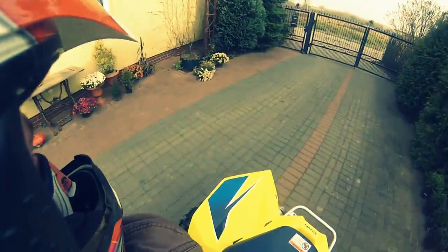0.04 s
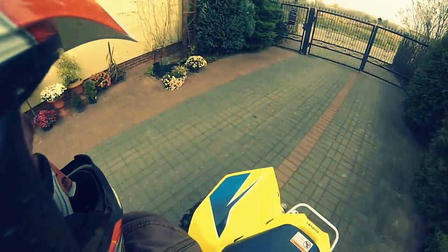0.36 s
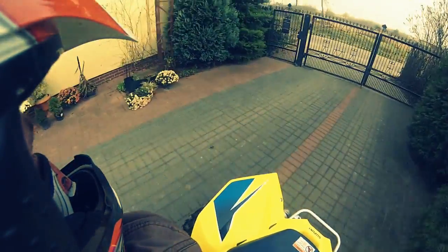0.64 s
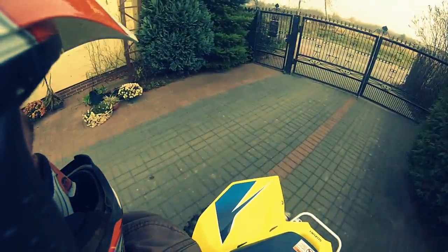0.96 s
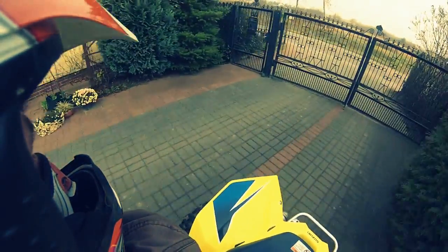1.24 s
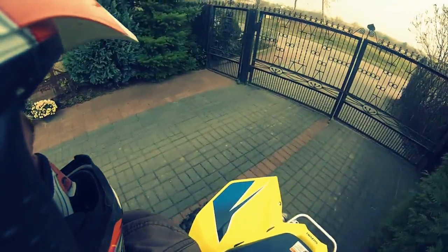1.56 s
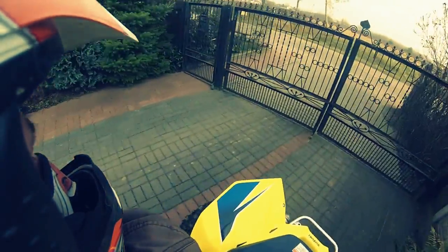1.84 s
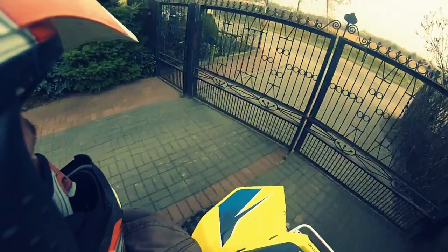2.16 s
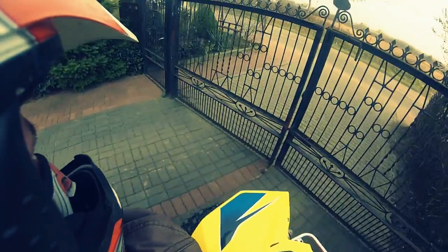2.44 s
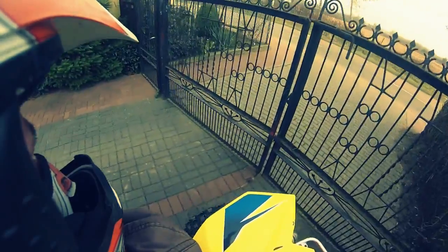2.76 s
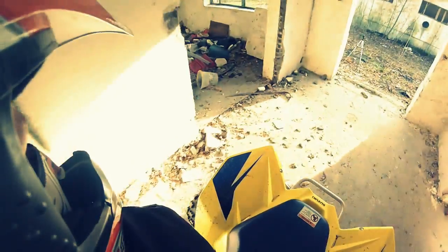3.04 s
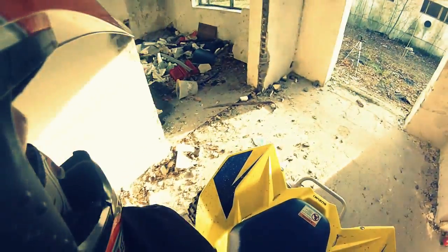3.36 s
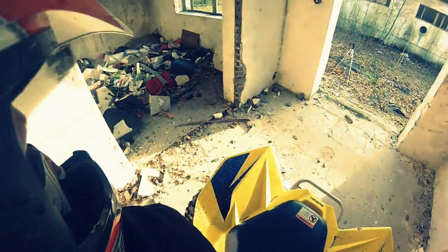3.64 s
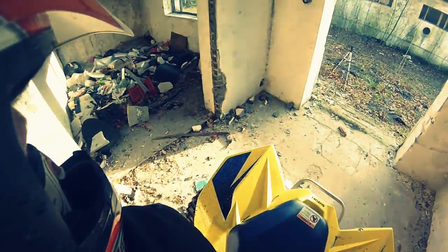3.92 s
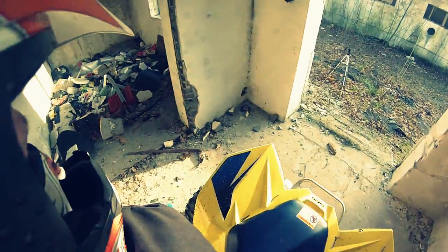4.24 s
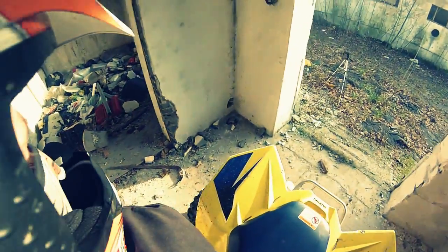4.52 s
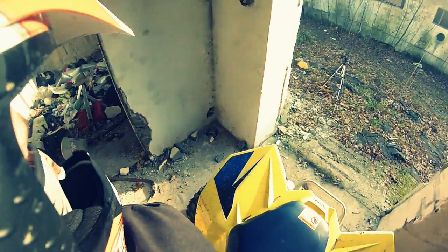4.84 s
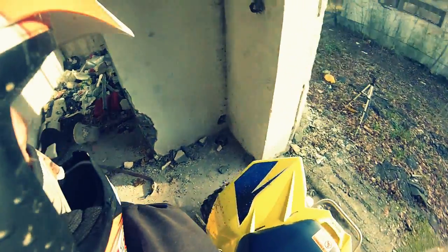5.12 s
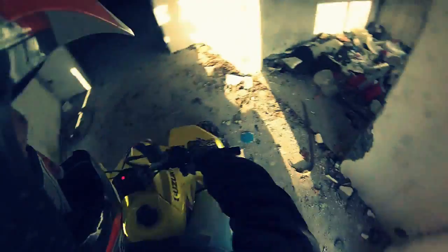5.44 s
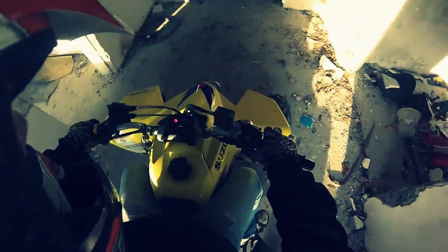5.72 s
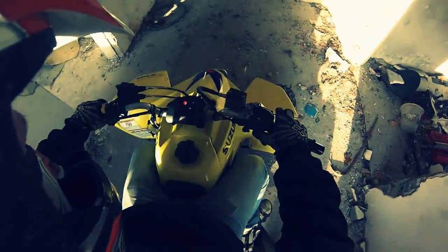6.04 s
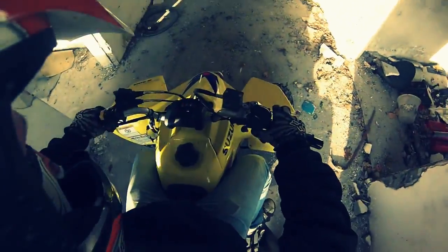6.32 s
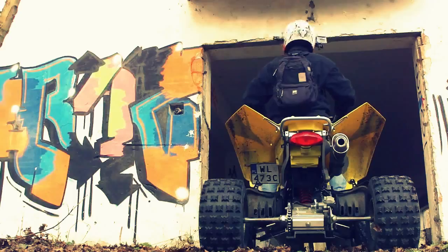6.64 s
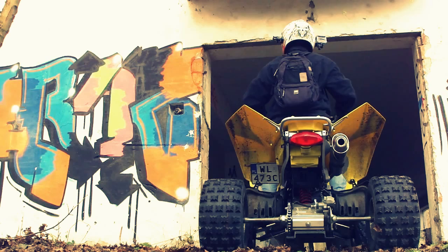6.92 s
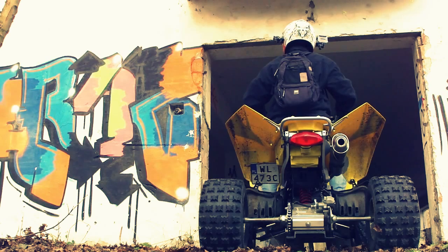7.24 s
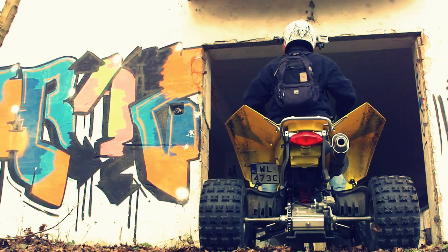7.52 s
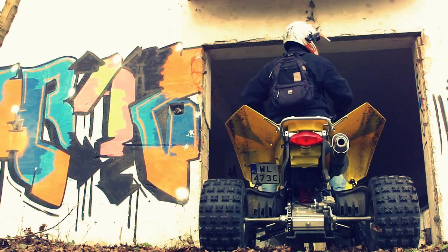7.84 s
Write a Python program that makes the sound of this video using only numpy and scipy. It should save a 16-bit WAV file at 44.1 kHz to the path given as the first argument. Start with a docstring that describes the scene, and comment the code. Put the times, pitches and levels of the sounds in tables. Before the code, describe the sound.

Heard from a helmet lightly buffeted by air, a four-stroke quad bike thumps along between short throttle blips that pop from the exhaust. After an abrupt cut indoors, the engine hums and booms off bare walls, its barks ringing on and loose metal knocking as it slows. Another cut puts the microphone low behind the exhaust, where the idle is much louder and the revs crackle sharply.

```python
"""On a paved driveway, then inside a bare ruin, a one-cylinder four-stroke quad bike idles and is revved.
We hear both from the rider's helmet, rocked by air, and last we listen from the ground behind the silencer.
Every firing thumps the exhaust pipe and pushes out a hiss of gas. On a blip (a quick twist of the throttle)
the firings bark and pop, and the walls throw the sound back.
Under the engine, trapped echoes boom, loose metal knocks, the silencer rings and the brakes rub."""
import sys
import numpy as np
from scipy import signal
from scipy.fft import rfft, irfft
from scipy.io import wavfile
from scipy.ndimage import uniform_filter1d

SR = 44100
rng = np.random.default_rng(int(sys.argv[2]) if len(sys.argv) > 2 else 0)


def bounce(signal):
    """Save signal as a 16-bit WAV file at the path given by the first command-line argument."""
    frames = np.transpose(np.atleast_2d(signal))
    limited = np.clip(frames, -1, 1)
    pcm = np.round(limited * 32767).astype(np.int16)
    wavfile.write(sys.argv[1], SR, pcm)


N = 347508
T = np.arange(N) / SR
RUIN_S, BEHIND_S = 2.862, 6.423  # when the second and third places begin

# Twists of the throttle, each a run of hard firings; step_db is the change from one to the next:
# start_s, firing_count, first_rate_hz, top_rate_hz, level_db, step_db, treble_db
THROTTLE_BLIPS = [(0.415, 5, 26.4, 41.5, -8, 1, 1), (0.804, 2, 36, 41, -2, -3.5, 8),
                  (1.053, 2, 36, 41, -5, -3.5, 11), (1.305, 4, 26, 41.8, -3.5, -1.8, 8.5),
                  (1.608, 2, 38, 37.7, -2.5, -6, 9), (1.804, 1, 34, 22, -32, -5, 23),
                  (3.975, 5, 24.9, 43.6, -7.5, 1.4, -13.5), (4.351, 1, 35.3, 47.6, 4, 27, -4),
                  (4.635, 1, 34.5, 49, 1.5, 0, 1), (4.885, 3, 31.4, 40.8, -3, -4.5, -7),
                  (5.115, 1, 30.6, 36.6, -24, -2, 9.5), (6.988, 1, 12, 14.5, -1.5, 0, 0),
                  (7.031, 6, 28.5, 36.5, -0.5, -0.5, 0), (7.239, 2, 33, 32, -7.5, 2, -8),
                  (7.292, 2, 35, 39, -2, -3, 2), (7.347, 2, 28.4, 43, 1.5, -10, 0),
                  (7.524, 1, 21, 36, -8, 0, -20), (7.548, 5, 35.5, 38.7, -0.5, -1.2, 1),
                  (7.822, 2, 29, 11, 0, -10, 0)]
def hard_firings():
    """The open throttle makes the cylinder fire hard: one (start_s, level_db, treble_db) per firing."""
    return [(start_s, level_db + k * step_db, treble_db)
            for *blip, level_db, step_db, treble_db in THROTTLE_BLIPS
            for k, start_s in enumerate(blip_times(*blip))]


def blip_times(start_s, count, first_hz, top_hz):
    """When the cylinder fires during one blip: the faster the engine, the shorter the gaps."""
    gaps = 1 / np.linspace(first_hz, top_hz, max(round(count), 1) - 1)
    return start_s + np.concatenate([[0], np.cumsum(gaps)])


# The engine between blips: time_s, firing_rate_hz, throttle (0 shut, 1 wide open)
STEADY_RUNNING = [(0, 14.15, 0.58), (2.849, 14.8, 0.92), (2.87, 22.2, 1), (3.2, 22.7, 1), (3.499, 23, 0.97),
                  (3.67, 23.4, 0.89), (3.772, 22, 0), (3.95, 19.3, 0.01), (5.65, 15.2, 0.01),
                  (6.95, 15.6, 0.26)]
def revs():
    """Each blip spins the engine up and friction slows it. Gives firings per second and throttle."""
    pickup_s, overrun_s, hang_s, coast_s = .1193, .028, .0225, .66
    open_s, shut_s = .015, .033
    t = T[::64]
    times, speed, throttle = np.transpose(STEADY_RUNNING)
    speed, throttle = np.interp(t, times, speed), np.interp(t, times, throttle)
    for start_s, count, first_hz, top_hz, *_ in THROTTLE_BLIPS:
        last_s = blip_times(start_s, count, first_hz, top_hz)[-1]
        climb = np.interp(t, [start_s - pickup_s, start_s, last_s + overrun_s], [0, first_hz, top_hz])
        coast = np.exp(-np.maximum(t - last_s - hang_s, 0) / coast_s)
        twist = np.interp(t, [start_s - open_s, start_s, last_s, last_s + shut_s], [0, 1, 1, 0])
        speed, throttle = np.maximum(speed, climb * coast), np.maximum(throttle, twist)
    return np.interp(T, t, speed), np.interp(T, t, throttle)


def effort(idle_db, doubling_db, throttle_db, idle_hz=15):
    """A layer's gain: set at idle, then changed by each doubling of speed and by opening the throttle."""
    speed, throttle = revs()
    return undb(idle_db + doubling_db * np.log2(speed / idle_hz) + throttle_db * throttle)


# Moments that keep the engine's beat in step between blips: mostly firings, plus two at the switches between
# places: time_s
BEAT_MOMENTS = [-.028, .161, .363, 1.868, 2.118, 2.364, 2.769, 2.867, 5.291, 5.596, 6.118, 6.424, 6.5385,
                6.664, 6.925, 7.434, 7.89]
def crank():
    """Count the engine's cycles as it turns; the cylinder fires at each whole number."""
    speed, _ = revs()
    cycles = np.cumsum(speed) / SR
    fire_s = np.sort(np.concatenate([BEAT_MOMENTS, np.array(hard_firings())[:, 0]]))
    outside_s = fire_s - np.clip(fire_s, 0, T[-1])
    at_firing = np.interp(fire_s, T, cycles) + outside_s * np.interp(fire_s, T, speed)
    whole = np.concatenate([[0], np.cumsum(np.round(np.diff(at_firing)))])
    return np.interp(cycles, at_firing, whole)


def firings(cycle, lag=0):
    """One kick of pressure in each engine cycle, never quite the same strength."""
    pulses, at = np.zeros(N), np.flatnonzero(np.diff(np.floor(cycle - lag)) > 0)
    pulses[at] = undb(rng.standard_normal(N)[:len(at)])
    return pulses


def thump(cycle, tone, intake_db, intake_lag, puff_db):
    """Each cycle gives an exhaust pulse with a swirling puff, and a weaker gulp of air going in."""
    speed, _ = revs()
    pulses = firings(cycle) - undb(intake_db) * firings(cycle, intake_lag)
    puff = unit(rng.standard_normal(N) * np.exp(-(cycle % 1) / 1.2))
    puff = filtered(puff, "high", 330)
    return colour(unit(pulses / np.sqrt(speed)) + undb(puff_db) * puff, tone)


# Extra barks and second cracks on or just around the hard firings: start_s, level_db, treble_db
EXTRA_BARKS = [(0.536, -7.5, -1), (1.321, -10, 12), (1.392, -8.5, 7.5), (1.621, -8.5, 14.5),
               (1.644, -13, 10.5), (4.417, -15, -14), (4.699, -12.5, -17), (4.945, -8.5, -20),
               (7.021, -2, -2), (7.209, -2.5, -9)]
def barks(from_s, until_s, tone, decay_s, shock_db):
    """Each hard firing or extra bark is a shock, then a spiky burst of gas that dies in milliseconds."""
    out, t = np.zeros(N + SR), T[:SR // 8]
    fade = np.exp(-t / decay_s)
    for start_s, level_db, treble_db in hard_firings() + EXTRA_BARKS:
        hiss, spikes = rng.standard_normal((2, len(t)))
        if from_s <= start_s < until_s:
            crackle = undb(2 * np.interp(t / .001, np.arange(len(t)), spikes))
            burst = unit(hiss * crackle * fade) * np.sqrt(np.mean(fade ** 2))
            burst[0] += undb(shock_db) * np.linalg.norm(burst)
            burst += (undb(treble_db) - 1) * filtered(burst, "high", 3000, order=1)
            at = int(start_s * SR)
            out[at:at + len(t)] += undb(level_db) * burst
    return colour(out[:N], tone)


def rush(cycle, tone, length, valve_db, steady_db, rise=1e-4):
    """Gas hisses after each firing and the valves clatter half a cycle on. Rise and length are in cycles."""
    def puff(phase):
        return np.exp(-phase / length) * (1 - np.exp(-phase / rise))
    strength = undb(1.1 * rng.standard_normal(N))[(2 * cycle).astype(int)]
    puffs = puff(cycle % 1) + undb(valve_db) * puff((cycle + .5) % 1)
    return unit(colour(rng.standard_normal(N) * (strength * puffs + undb(steady_db)), tone))


def drone(cycle, resonances, waver_db, top_harmonic=8):
    """Harmonics (multiples of the firing rate) waver, and swell as they pass a pipe's or room's notes."""
    speed, _ = revs()
    out = 0
    for harmonic in range(2, top_harmonic + 1):
        gain = sum(undb(db) / (1 + (2 * (harmonic * speed - hz) / width) ** 2)
                   for hz, width, db in resonances)
        waver = undb(waver_db * np.interp(cycle, np.arange(400), rng.standard_normal(400)))
        out += gain * waver * np.cos(2 * np.pi * harmonic * (cycle - .1 - harmonic / 60))
    return unit(out / (np.sqrt(local_power(out, SR // 4)) + .44))  # partly evens out the swells


# Tone of the thump, gas, barks and moving parts on the driveway: pitch_hz, level_db
DRIVEWAY_THUMP = [(100, -21), (150, -14), (200, 7), (260, -9.5), (382, -15.5), (454, -14.5), (810, -35),
                  (1030, -45), (1200, -19.5), (1560, -52), (2640, -120)]
DRIVEWAY_GAS = [(350, -27), (600, -13.5), (1030, -17), (1180, -8), (1320, -13), (1450, 1), (1710, -9.5),
                (2310, -7.5), (3030, -16.5), (3290, -18), (5150, -25.5), (5740, -32), (6670, -22.5),
                (7640, -34), (15500, -45)]
DRIVEWAY_BARK = [(88, -10), (150, -3), (213, -0.5), (631, -4), (781, -2), (930, -10.5), (1180, -5),
                 (1320, -7), (1450, 3), (1730, -9), (2270, -2.5), (3830, -17.5), (6600, -21),
                 (15500, -46.5)]
DRIVEWAY_WHIRR = [(240, -55), (400, -1), (527, -18), (569, -10), (1050, -5), (1470, -40), (1660, -50),
                  (5070, -10), (8280, -15.5), (15500, -18)]
# Notes at which the pipe and air box ring: pitch_hz, width_hz, level_db
PIPE_NOTES = [(78, 22, 14), (112, 30, -1), (200, 70, 4.5), (285, 60, -6)]
def engine_on_driveway(cycle):
    """On open paving, the house wall next to the engine slaps back a short echo."""
    pipe = thump(cycle, DRIVEWAY_THUMP, intake_db=-44, intake_lag=.9, puff_db=3.5)
    pipe = unit(walls(pipe, tail_s=.21, tail_db=-39, echo_s=.017, echo_db=-2.5))
    pipe *= effort(idle_db=-45, doubling_db=1.5, throttle_db=3)
    hum = drone(cycle, PIPE_NOTES, waver_db=1.5, top_harmonic=13)
    hum *= effort(idle_db=-42, doubling_db=12, throttle_db=-5.5)
    gas = rush(cycle, DRIVEWAY_GAS, length=.25, valve_db=-8, steady_db=-11, rise=.06)
    gas *= effort(idle_db=-54, doubling_db=13, throttle_db=3)
    whirr = rush(cycle, DRIVEWAY_WHIRR, length=.2, valve_db=-4, steady_db=-4, rise=.07) * undb(-64.5)
    pops = barks(0, RUIN_S, DRIVEWAY_BARK, decay_s=.0054, shock_db=-23) * undb(-9.5)
    pops = walls(pops, tail_s=.24, tail_db=-5.5, echo_s=.011, echo_db=-10, dull_hz=4150)
    return pipe + hum + gas + whirr + pops


# Tone of the thump, gas, barks and moving parts in the ruin: pitch_hz, level_db
INDOOR_THUMP = [(70, -5), (100, 7), (165, -0.5), (195, 2), (222, 3), (275, 2), (372, -6), (434, -9.5),
                (490, -11.5), (721, -23), (1200, -25), (1560, -13), (2640, -120)]
INDOOR_GAS = [(350, -25), (600, -10.5), (979, -15.5), (1140, -4.5), (1250, -9.5), (1390, 0), (1620, -0.5),
              (1990, -6), (2570, -6.5), (2950, -11.5), (4620, -21.5), (5290, -19), (5900, -27.5),
              (6760, -25), (15500, -47.5)]
INDOOR_BARK = [(88, -8), (150, -22), (400, -7), (490, 0.5), (620, -7), (985, -5.5), (1370, -3),
               (1910, -3.5), (2270, -3.5), (4560, -12.5), (5230, -7), (5760, -15), (6470, -12.5),
               (15500, -34.5)]
INDOOR_WHIRR = [(240, -59), (400, -9), (488, -26), (543, -49), (809, 0), (1360, -4.5), (1470, -15),
                (1590, 2), (3160, 0.5), (3850, -15.5), (4840, -9), (6190, -19.5), (15500, -28.5)]
# Notes at which the ruin's rooms hum and howl with the engine: pitch_hz, width_hz, level_db
ROOM_HUM_NOTES = [(59.4, 8.7, -1), (77.3, 8.3, -3.5), (89.3, 11, -0.5), (116, 10, -7)]
ROOM_HOWL_NOTES = [(222, 16, 0), (270, 26, -1), (366, 45, -9)]
def engine_in_ruin(cycle):
    """The thump rumbles round bare plaster rooms, and the pops ring on."""
    pipe = thump(cycle, INDOOR_THUMP, intake_db=-18.5, intake_lag=.55, puff_db=-1.5)
    pipe = unit(walls(pipe, tail_s=.55, tail_db=0, echo_s=.011, echo_db=-6))
    pipe *= effort(idle_db=-40.5, doubling_db=8.5, throttle_db=7)
    hum = drone(cycle, ROOM_HUM_NOTES, waver_db=3.5)
    hum *= effort(idle_db=-35, doubling_db=5, throttle_db=-4.5)
    howl = drone(cycle, ROOM_HOWL_NOTES, waver_db=1, top_harmonic=18)
    howl *= effort(idle_db=-46.5, doubling_db=10, throttle_db=5.5)
    # the hiss comes round by the walls, a little after the thump
    gas = rush(cycle - .08, INDOOR_GAS, length=.25, valve_db=-17, steady_db=-12, rise=.07)
    gas *= effort(idle_db=-47.5, doubling_db=14, throttle_db=7)
    whirr = rush(cycle, INDOOR_WHIRR, length=.52, valve_db=6, steady_db=-5) * undb(-47)
    pops = barks(RUIN_S, BEHIND_S, INDOOR_BARK, decay_s=.0053, shock_db=-40) * undb(-7.5)
    pops = walls(pops, tail_s=.6, tail_db=-.5, echo_s=.0086, echo_db=4, dull_hz=3370)
    return pipe + hum + howl + gas + whirr + pops


# Tone of the thump, gas, barks and sharp spit at the silencer's mouth: pitch_hz, level_db
REAR_THUMP = [(35, -27), (60, -22), (75, -13), (93, 0), (108, -16), (135, -25), (195, 5), (262, -4.5),
              (381, 0.5), (480, -21.5), (644, -5.5), (823, -15), (1280, -39), (2390, -43), (3900, -74)]
REAR_GAS = [(500, 8.5), (1000, 5), (1600, 4), (2400, -5), (3100, -23), (4200, -29.5), (5200, -28.5),
            (5900, -17), (7500, -19), (10500, -25.5), (12000, -57), (15500, -52)]
REAR_BARK = [(150, -12.5), (260, 1.5), (372, 2.5), (465, -9.5), (666, -0.5), (970, -7.5), (1460, -6.5),
             (1740, -19.5), (1990, -5.5), (2660, -29), (4150, -39.5), (6700, -29), (9280, -35),
             (15500, -73)]
REAR_SPIT = [(1500, -2), (4500, -25), (7000, 0), (10500, 17), (14000, -13)]
def engine_from_behind(cycle):
    """Low behind the silencer the beats are deep and hard; the hiss differs a little left and right."""
    pipe = thump(cycle, REAR_THUMP, intake_db=-34, intake_lag=.37, puff_db=-2)
    ring = putter(cycle, ring_hz=222, sag_hz=130, sag_s=.005, decay_s=.013)
    pipe = unit(pipe) + undb(6.5) * unit(ring)
    pipe = unit(walls(pipe, tail_s=.3, tail_db=-10, echo_s=.018, echo_db=-14))
    pipe *= effort(idle_db=-17.5, doubling_db=-4, throttle_db=-2)
    flow = effort(idle_db=-31, doubling_db=4, throttle_db=4.5)
    gas = rush(cycle, REAR_GAS, length=.2, valve_db=-36, steady_db=-5) * flow * undb(3)
    spit = rush(cycle, REAR_SPIT, length=.058, valve_db=-35, steady_db=-28) * flow * undb(-29)
    pops = barks(BEHIND_S, 8, REAR_BARK, decay_s=.0035, shock_db=-5) * undb(-4.5)
    honk = honks(ring_hz=590, scatter=.15, late_s=.002, half_length_s=.0032) * undb(-8.5)
    honk = walls(honk, tail_s=.22, tail_db=-7, echo_s=.03, echo_db=-14)
    cracks = flame_cracks(decay_s=.0018)
    pops = walls(pops, tail_s=.36, tail_db=-3, echo_s=.0066, echo_db=-11)
    middle = pipe + gas + spit + honk + cracks + pops
    scattered = rush(cycle, REAR_GAS, length=.1, valve_db=-18, steady_db=1) * flow
    side = undb(-19) * scattered + undb(1.5) * np.diff(scattered, prepend=0)
    return np.array([undb(-.3) * middle + side, undb(1.6) * middle - side])


def putter(cycle, ring_hz, sag_hz, sag_s, decay_s):
    """Each firing rings the air in the tailpipe; the note sags as the hot gas leaves."""
    t = T[:SR // 10]
    turns = np.cumsum(ring_hz + sag_hz * np.exp(-t / sag_s)) / SR
    ring = np.sin(2 * np.pi * turns) * np.exp(-t / decay_s)
    return convolve(firings(cycle), filtered(ring, "high", 130))


def honks(ring_hz, scatter, late_s, half_length_s):
    """Heard from behind, each hard firing also blows a short honk out of the silencer."""
    out = np.zeros(N)
    for start_s, level_db, _ in hard_firings():
        detune, phase = rng.standard_normal(2)
        if start_s >= BEHIND_S:
            near = np.abs(T - start_s) < .05
            t = T[near] - start_s - late_s
            note = np.sin(2 * np.pi * (ring_hz * (1 + scatter * detune) * t + phase))
            out[near] += undb(level_db) * swell(t, half_length_s) * note
    return out


# Flame reaching the mouth of the silencer: start_s, level_db
FLAMES = [(6.988, -40), (7.033, -16.5), (7.069, -15.5), (7.099, -13), (7.126, -16), (7.186, -21),
          (7.2705, -28), (7.292, -10.5), (7.3205, -28), (7.348, -15.5), (7.407, -26), (7.493, -37),
          (7.548, -15), (7.578, -21), (7.606, -16), (7.63, -15), (7.823, -21)]
# Tone of its crack: pitch_hz, level_db
FLAME_TONE = [(1500, 10.5), (2600, 4), (4000, 0.5), (6000, -15), (10000, -16), (15500, -25)]
def flame_cracks(decay_s):
    """Each flame is a burst of gas that starts at once and is gone in a few milliseconds."""
    bursts = sum(undb(db) * (T >= s) * np.exp(-np.abs(T - s) / decay_s) for s, db in FLAMES)
    return colour(bursts * rng.standard_normal(N), FLAME_TONE)


def walls(x, tail_s, tail_db, echo_s, echo_db, dull_hz=3000):
    """Add a slap off the nearest wall and a wash of echoes that falls 60 dB in tail_s, treble sooner."""
    t, noise = T[:SR], rng.standard_normal(SR)
    low = filtered(noise, "low", dull_hz, order=1)
    tail = low + (noise - low) * undb(-40 * t / tail_s)
    tail *= undb(-60 * t / tail_s) * np.clip(t / echo_s - .3, 0, 1)
    response = undb(tail_db) * tail / np.linalg.norm(tail)
    response[0] += 1  # the direct sound
    slap = noise[::-1] * np.exp(-np.abs(t - echo_s) / .0029)  # rough stonework smears the slap
    return convolve(x, response + undb(echo_db) * slap / np.linalg.norm(slap))


# Low notes trapped between nearby walls: peak_s, pitch_hz, half_length_s, level_db
WALL_BOOMS = [(1.82, 108, .15, -28.5), (3.158, 135.5, 0.23, -17), (3.52, 136.5, 0.23, -25),
              (3.76, 119, 0.2, -23), (3.27, 230, 0.26, -25.5), (4.258, 76, 0.068, -21.5),
              (4.494, 134, 0.087, -18), (3.6, 340, 0.12, -31), (4.805, 76.5, 0.078, -21),
              (4.784, 136.3, .09, -22.5), (4.927, 200, 0.27, -28), (4.957, 370, .08, -25),
              (5.5, 137, 0.089, -31), (5.4, 110, 0.087, -25), (6.15, 150, .3, -44)]
def booms(waver, pull):
    """Sound bouncing between walls builds up and dies away; the revs pull its pitch a little along."""
    speed, _ = revs()
    out = 0
    for peak_s, hz, half_length_s, db in WALL_BOOMS:
        turns = np.cumsum(hz * (speed / np.interp(peak_s, T, speed)) ** pull) / SR
        note = np.sin(2 * np.pi * turns) + waver * ringing_noise(hz, width_hz=25)
        same_place = (T < RUIN_S) == (peak_s < RUIN_S)
        out += note * swell(T - peak_s, half_length_s) * undb(db) * same_place
    return out


# Slack in the drive knocking as the engine slows: start_s, level_db
SLACK_KNOCKS = [(1.875, -39), (1.908, -39), (1.951, -36), (1.989, -36), (2.03, -41), (2.08, -38),
                (2.706, -44), (2.774, -41), (5.219, -24), (5.255, -26), (5.291, -21), (5.333, -21),
                (5.375, -30), (5.422, -31)]
# Notes at which the knocked metal rings: pitch_hz, width_hz, level_db
METAL_NOTES = [(1434, 80, 4.5), (1556, 24, -6.5), (1610, 75, -2), (2280, 1100, -13)]
def loose_metal(cycle, chatter_db, chatter_lag, chatter_width, knock_s):
    """Loose metal chatters once a firing on the driveway, and knocks harder when the drive goes slack."""
    push = undb(chatter_db) * swell(cycle % 1 - chatter_lag, chatter_width) * (T < RUIN_S)
    for start_s, level_db in SLACK_KNOCKS:
        age = np.maximum(T - start_s, 0) / knock_s
        push += undb(level_db) * age * np.exp(1 - age)
    ring = unit(sum(undb(db) * ringing_noise(hz, width) for hz, width, db in METAL_NOTES))
    return push * ring / np.sqrt(local_power(ring, SR // 80) + .62)


# The tinny silencer shell, and the brakes rubbing: peak_s, pitch_hz, width_hz, half_length_s, level_db
SHELL_RINGS = [(1.39, 1510, 240, 0.044, -24), (1.624, 1430, 300, .012, -14.5),
               (1.637, 1970, 500, 0.016, -22), (4.093, 2180, 380, 0.057, -19),
               (4.184, 1610, 258, 0.17, -27), (4.466, 1296, 244, 0.11, -26.5),
               (4.692, 1230, 330, 0.063, -24.5), (4.896, 2410, 350, 0.0072, -9.5),
               (4.963, 1870, 280, 0.063, -23.5), (5.12, 2320, 304, 0.028, -27)]
BRAKE_RUBS = [(5.66, 8500, 90, .04, -60), (6.1, 3170, 9, .65, -55)]
def shaken_metal(cycle, rings, steady, length):
    """Metal rings swell and fade, shaken by each firing; a shake dies away over `length` cycles."""
    shake = unit(steady + np.exp(-(cycle % 1) / length))
    return shake * sum(ringing_noise(hz, width) * swell(T - peak_s, half_length_s) * undb(db)
                       for peak_s, hz, width, half_length_s, db in rings)


# How hard the air pushes on the helmet: time_s, level_db
AIR_GUSTS = [(0.0, -22.5), (0.16, -19.5), (0.48, -25.5), (0.55, -20), (1.5, -27.5), (2.16, -21.5),
             (2.48, -30), (2.51, -21), (2.65, -32), (3.03, -20), (3.23, -34), (3.62, -24.5), (4.81, -28.5),
             (5.38, -28.5), (5.47, -15), (5.79, -42), (5.86, -27), (6.4, -27)]
def air_on_helmet():
    """Air rocks the helmet: a slow wobble, almost a note, at the very bottom of hearing."""
    wobble = resonate(rng.standard_normal(N), hz=25.4, width_hz=17)
    wobble = unit(resonate(wobble, hz=21, width_hz=18.3))
    evened = wobble / np.sqrt(local_power(wobble, SR // 6) + .34)
    level_db = np.interp(T, *np.transpose(AIR_GUSTS)) + 1.5
    return unit(filtered(evened, "low", 44)) * undb(level_db)


def undb(db):
    """Turn decibels into a number to multiply by."""
    return 10 ** (np.asarray(db) / 20)


def unit(x):
    """Scale a sound to an average power of 1."""
    return x / np.sqrt(np.mean(x ** 2) + 1e-18)


def local_power(x, samples):
    """Average power around each moment."""
    return np.abs(uniform_filter1d(x ** 2, size=samples))


def swell(offset, half_length):
    """A smooth hump that peaks where offset is 0."""
    return np.exp(-(offset / half_length) ** 2)


def convolve(x, response):
    """Let every sample of x set off a copy of the response."""
    return signal.oaconvolve(x, response)[:len(x)]


def filtered(x, keep, hz, order=2):
    """Keep the "low" or the "high" side of a pitch."""
    return signal.sosfilt(signal.butter(order, hz, keep, fs=SR, output="sos"), x)


def resonate(x, hz, width_hz):
    """Keep a band around one pitch."""
    return signal.lfilter(*signal.iirpeak(hz, hz / width_hz, fs=SR), x)


def ringing_noise(hz, width_hz):
    """Noise narrowed to a rough note."""
    return unit(resonate(resonate(rng.standard_normal(N), hz, width_hz), hz, width_hz))


def colour(x, tone, size=8192):
    """Shape x with a table of (pitch_hz, level_db), falling steeply past the table's ends."""
    hz, db = np.transpose(tone)
    octave, known = np.log2(np.maximum(np.fft.rfftfreq(size, 1 / SR), 1)), np.log2(hz)
    outside = np.abs(octave - np.clip(octave, known.min(), known.max()))
    gain = undb(np.interp(octave, known, db) - np.minimum(30 * outside, 60))
    # folding the late half forward makes the filter ring only after a hit, never before
    folded = irfft(np.log(gain))
    folded[1:size // 2] *= 2
    folded[size // 2 + 1:] = 0
    response = irfft(np.exp(rfft(folded)))
    return convolve(x, response / np.linalg.norm(response))


def scene():
    """One running engine, heard in three places with a sudden switch between them."""
    cycle = crank()
    knocks = loose_metal(cycle, chatter_db=-54, chatter_lag=.27, chatter_width=.22, knock_s=.006)
    boom = booms(waver=.17, pull=.12)
    shell = shaken_metal(cycle, SHELL_RINGS, steady=.66, length=.28)
    brakes = shaken_metal(cycle, BRAKE_RUBS, steady=.88, length=.46)
    engine = np.where(T < RUIN_S, engine_on_driveway(cycle), engine_in_ruin(cycle))
    helmet = engine + boom + knocks + shell + brakes + air_on_helmet()
    return np.where(T < BEHIND_S, helmet, engine_from_behind(cycle))


def record(dry):
    """Round off the loudest pops and cut the highest treble."""
    ceiling, top_hz = .76, 15700
    rounded = dry / (1 + (dry / ceiling) ** 4) ** .25
    return signal.sosfilt(signal.ellip(8, .2, 70, top_hz, fs=SR, output="sos"), rounded)


dry = scene()
out = record(dry)
bounce(out)
```